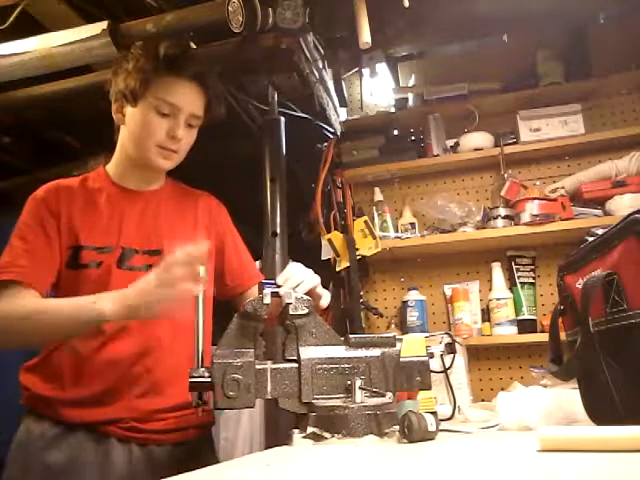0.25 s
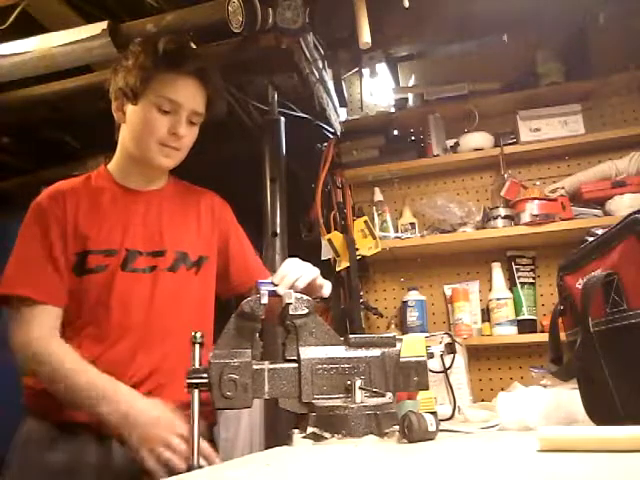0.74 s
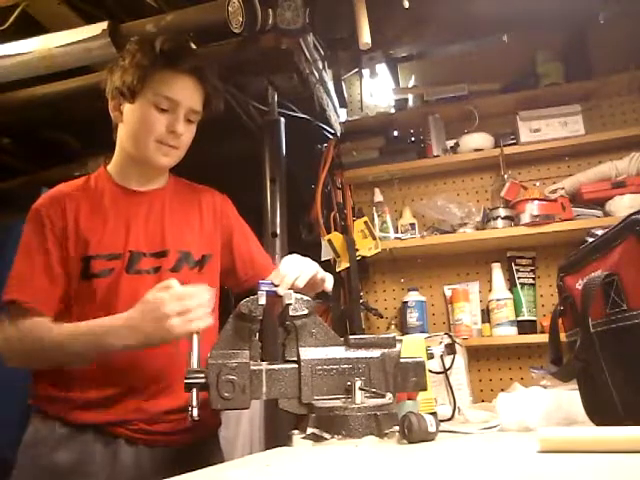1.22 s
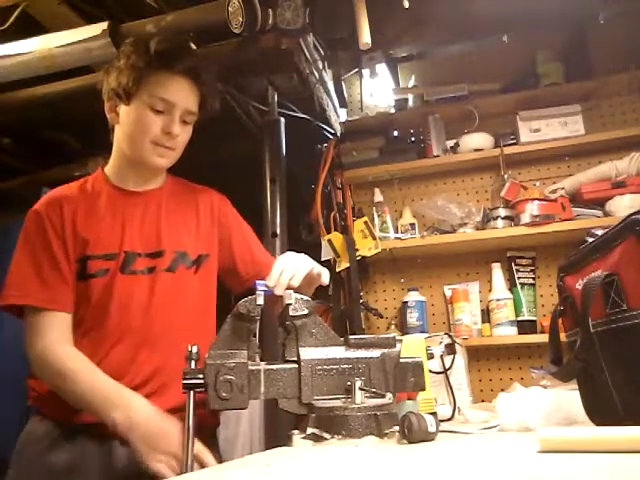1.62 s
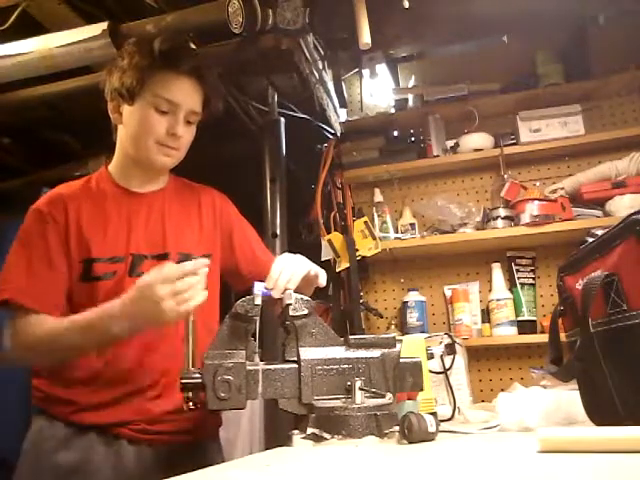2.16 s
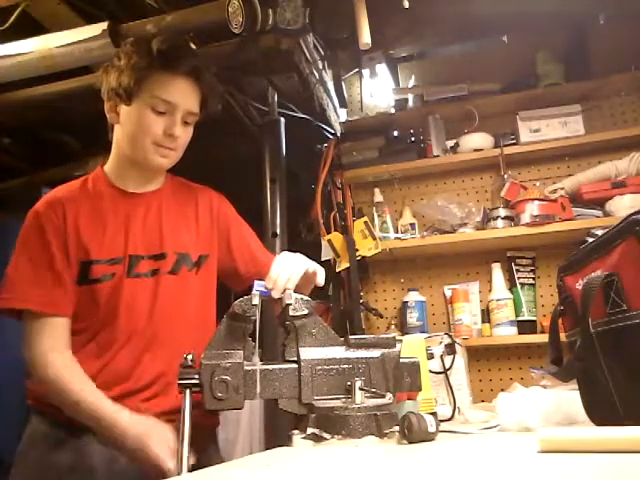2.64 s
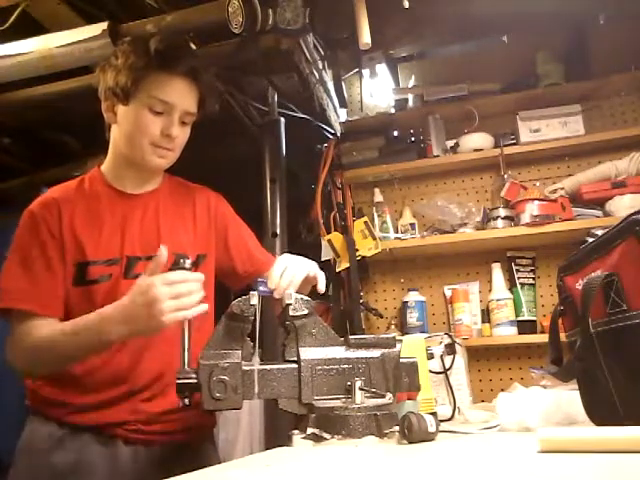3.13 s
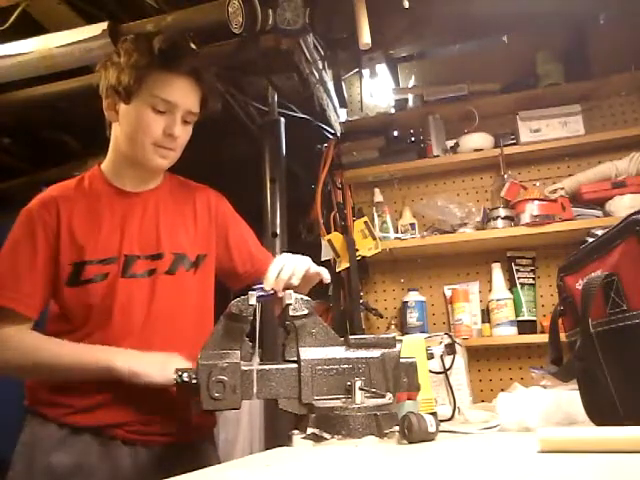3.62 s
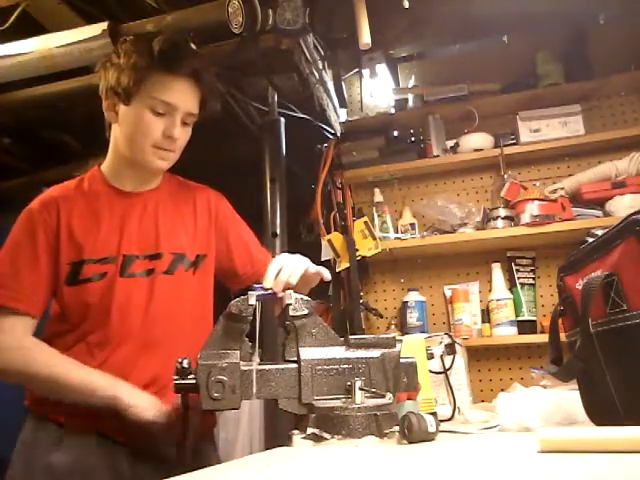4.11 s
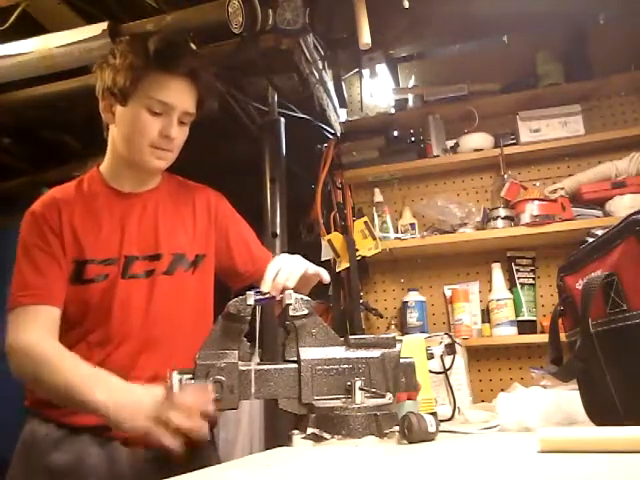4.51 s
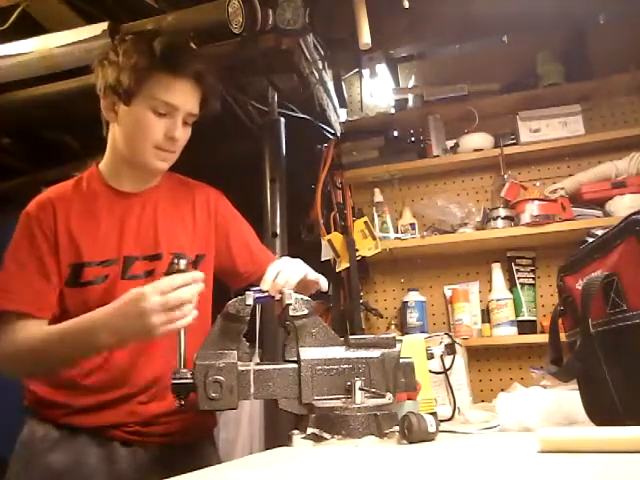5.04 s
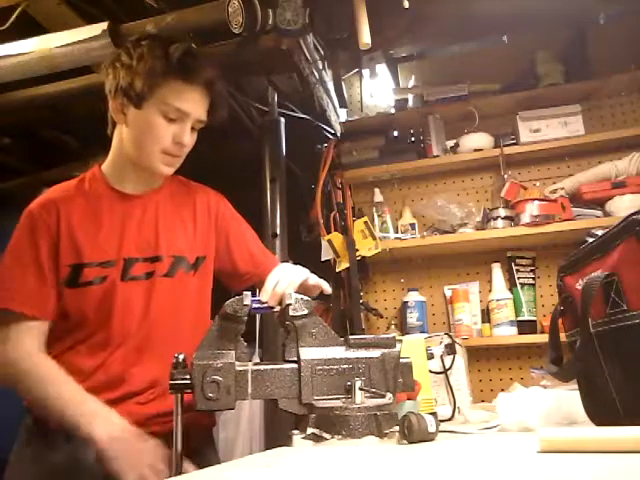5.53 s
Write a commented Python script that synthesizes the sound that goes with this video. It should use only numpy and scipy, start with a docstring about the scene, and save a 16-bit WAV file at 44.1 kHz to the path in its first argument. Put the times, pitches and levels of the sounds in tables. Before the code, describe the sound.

A steel bench vise is wound by hand: loud metal clinks and knocks, then a soft screw rub and light ticks in a workshop.

```python
"""A steel bench vise is wound by hand in a small basement workshop, heard by a spaced pair of microphones
over room rumble and hiss. It opens with a clatter: the loose handle clinks in its eye, the cast body
knocks as play is taken up, and the wooden bench thuds under it. From about 1.6 s it settles into the
soft rub of the turning screw and a few light ticks, and at 2.66 s a thin electronic whine comes in.
Two smaller flurries of clinks and knocks, near 4.4 s and 5.5 s, finish the move."""
import sys
import numpy as np
from scipy import signal
from scipy.fft import rfft, irfft, next_fast_len
from scipy.io import wavfile

SR = 44100
rng = np.random.default_rng(int(sys.argv[2]) if len(sys.argv) > 2 else 0)


def bounce(signal):
    """Save signal as a 16-bit WAV file at the path given by the first command-line argument."""
    frames = np.transpose(np.atleast_2d(signal))
    limited = np.clip(frames, -1, 1)
    pcm = np.round(limited * 32767).astype(np.int16)
    wavfile.write(sys.argv[1], SR, pcm)


N = 254456

# The loose handle slapping in its eye.
# Each row: start in seconds, strength in dB, centre pitch in Hz, chatter length in seconds.
HANDLE_CLINKS = [(0.156, -20, 1740, 0.071), (0.3073, -31, 1740, 0.084), (0.328, -26, 1580, 0.094),
                 (0.3647, -9.5, 3350, 0.091), (0.5765, -21.5, 2070, 0.13), (0.9946, -24.5, 1700, 0.043),
                 (1.1032, -25.5, 2080, 0.13), (1.154, -33, 1690, 0.24), (1.165, -37, 3600, 0.0081),
                 (1.217, -18, 1600, 0.12), (1.2413, -23, 1850, 0.033), (1.432, -25, 1520, 0.069),
                 (1.4673, -35, 1640, 0.052), (1.5794, -34, 1500, 0.023), (1.873, -33, 1900, 0.12),
                 (1.897, -35, 4000, 0.048), (2.001, -48, 1810, 0.043), (2.078, -51.5, 2000, 0.04),
                 (2.7322, -43.5, 3050, 0.016), (2.746, -41.5, 2620, 0.07), (2.7715, -40.5, 3000, 0.012),
                 (2.7765, -39.5, 3320, 0.069), (2.8003, -46, 2500, 0.04), (2.851, -45, 4300, 0.025),
                 (3.0153, -46, 1840, 0.095), (3.2128, -45.5, 1830, 0.051), (3.3726, -47.5, 1746, 0.084),
                 (3.5503, -46.5, 1990, 0.037), (3.6121, -41.5, 2370, 0.027), (3.933, -42, 3270, 0.1),
                 (3.9676, -51, 2510, 0.045), (4.3748, -29.5, 3036, 0.03), (4.441, -53, 2600, 0.0089),
                 (4.5012, -26, 2880, 0.0042), (4.5035, -27, 2910, 0.038), (4.7313, -44.5, 2410, 0.033),
                 (4.7701, -48, 3010, 0.031), (5.391, -45, 3570, 0.086), (5.5253, -31.5, 2170, 0.045),
                 (5.551, -31, 3180, 0.028)]
# Touches that ring a narrow band of the handle.
# Each row: start in seconds, strength in dB, centre pitch in Hz, chatter length in seconds.
HANDLE_PINGS = [(0.157, -35, 3370, 0.021), (0.2386, -33.5, 3440, 0.065), (0.3655, -17, 2860, 0.029),
                (1.105, -43, 3370, 0.03), (1.1555, -29.5, 1650, 0.024), (1.218, -38, 3300, 0.06),
                (1.241, -35, 3300, 0.025), (1.433, -41, 3100, 0.023), (2.8675, -46, 1740, .012),
                (4.5012, -28, 3710, 0.013), (5.3564, -46.5, 3680, 0.044), (5.4101, -46.5, 3680, 0.025),
                (5.4573, -49, 3670, 0.061)]
# Play being taken up in the cast body.
# Each row: start in seconds, strength in dB, centre pitch in Hz, chatter length in seconds.
BODY_KNOCKS = [(0.119, -51, 880, 0.039), (0.157, -20, 870, 0.065), (0.238, -33, 1160, 0.019),
               (0.308, -31, 1230, 0.13), (0.329, -31, 840, 0.25), (0.366, -13, 834, 0.039),
               (0.379, -26, 655, 0.014), (0.576, -42.5, 920, 0.18), (0.61, -31.5, 664, 0.022),
               (0.794, -46, 870, 0.12), (0.969, -52, 675, 0.027), (0.998, -22, 1060, 0.031),
               (1.064, -45, 700, 0.027), (1.113, -21, 790, 0.0093), (1.126, -26.5, 503, 0.0096),
               (1.154, -24, 900, 0.085), (1.223, -18.5, 770, 0.044), (1.239, -19.5, 770, 0.024),
               (1.432, -37, 780, 0.13), (1.468, -35.5, 710, 0.084), (1.505, -36.5, 595, 0.1),
               (1.58, -39, 1030, 0.038), (1.897, -44, 740, 0.021), (2.002, -50, 613, 0.035),
               (2.733, -54, 600, 0.01), (2.772, -53.5, 514, 0.043), (2.868, -48.5, 890, 0.01),
               (3.048, -38, 721, 0.029), (3.549, -52.5, 1010, 0.038), (3.934, -45, 1037, 0.09),
               (3.968, -48.5, 1064, 0.014), (4.376, -36, 990, 0.038), (4.44, -51.5, 506, 0.026),
               (4.475, -51.5, 896, 0.033), (4.503, -43.5, 536, 0.017), (4.638, -50, 686, 0.015),
               (4.732, -55.5, 694, 0.041), (4.772, -51.5, 1040, 0.018), (5.245, -51, 613, 0.043),
               (5.458, -42.5, 495, 0.031), (5.525, -39, 1100, 0.048), (5.552, -41.5, 1060, 0.05),
               (5.605, -54, 950, 0.022), (5.624, -45.5, 1050, 0.016), (5.651, -51, 1023, 0.028)]
# The bench top taking the load.
# Each row: start in seconds, strength in dB, centre pitch in Hz, chatter length in seconds.
BENCH_THUDS = [(0.098, -32, 71, 0.2), (0.165, -23, 144, 0.083), (0.22, -31.5, 71.6, 0.076),
               (0.327, -32.5, 178, 0.12), (0.377, -18, 126, 0.061), (0.612, -24.5, 302, 0.057),
               (1.005, -25.5, 298, 0.079), (1.03, -31, 61.7, 0.078), (1.123, -21.5, 200, 0.018),
               (1.162, -22, 380, 0.008), (1.18, -17, 69.6, 0.34), (1.229, -23, 165, 0.23),
               (1.255, -21.5, 80, 0.091), (1.448, -33.5, 119, 0.083), (1.506, -26.5, 136, 0.03),
               (1.893, -38, 216, 0.067), (2.157, -44.5, 193, 0.029), (3.058, -40, 222, 0.031),
               (4.485, -36.5, 150, 0.086), (4.641, -49.5, 194, 0.092), (5.246, -50.5, 188, 0.029),
               (5.464, -38, 180, 0.062), (5.524, -38, 139, 0.012)]
# How each part rings. Each row: pitch in Hz, relative level in dB, time to fade 60 dB in seconds.
HANDLE_MODES = [(1380, 11, 0.007), (1660, -1.5, 0.015), (1770, 12, 0.0084), (1916, -14.5, 0.025),
                (2330, -3, 0.02), (2490, -6, 0.025), (2734, -6.5, 0.01), (2880, -1, 0.016),
                (3154, 2.5, 0.0097), (3329, 0, 0.026), (3690, -0.5, 0.014), (4037, -0.5, 0.017),
                (4450, 2.5, 0.0093), (4800, -2, 0.02), (5466, 5, 0.0036), (6090, -4, 0.016),
                (6630, -1.5, 0.018), (8000, -21, 0.014), (11220, -11, 0.0087), (10140, -4, 0.0226),
                (14320, -13.5, 0.0393)]
BODY_MODES = [(420.6, -6, 0.039), (515, -6, 0.11), (612.5, -5.5, 0.07), (700.4, 5.5, 0.048),
              (770.5, 3.5, 0.026), (867.4, -0.5, 0.05), (987.5, 5.5, 0.025), (1270, -12.5, 0.021)]
BENCH_MODES = [(81.7, 5, 0.067), (104, 0, 0.063), (157, -4, 0.05), (199.2, 3.5, 0.055), (235, -1.5, 0.044),
               (302, 2, 0.045), (363.5, -5, 0.055)]
# The screw turning in its nut. Each row: time in seconds, body rub in dB, bench rumble in dB.
SCREW_RUB = [(0, -76.5, -60), (.1, -61, -91), (0.4, -63, -42), (0.561, -57.5, -51.5), (0.851, -70.5, -68.5),
             (.98, -68, -64), (1.219, -56, -31.5), (1.498, -61.5, -54.5), (1.7, -70.5, -67),
             (2.25, -67.5, -66.5), (2.361, -65, -63), (2.5, -70, -65), (2.62, -64, -65), (2.7, -68.5, -62),
             (2.78, -66, -68), (2.9, -67, -67.5), (3.2, -68, -64), (3.402, -80.5, -72), (4.198, -77, -74),
             (4.499, -64.5, -63), (4.849, -89.5, -72), (5.279, -73.5, -76), (5.402, -60, -59),
             (5.578, -60, -58.5), (5.719, -84.5, -71)]
# The colour of the room tone. Each row: frequency in Hz, relative level in dB.
ROOM_SPECTRUM = [(29, -46), (55, -17.5), (245, -4.5), (688, -11), (795, -6.5), (1260, -6), (4390, -17),
                 (14300, -19.5), (15700, -20)]
# How centred the room tone sits. Each row: frequency in Hz, left-right correlation (1 is mono).
ROOM_CORRELATION = [(60, 0.41), (500, 0.2794), (1500, 0.1255), (5000, 0.042), (14000, 0.081)]
# The tones of the electronic whine. Each row: pitch in Hz, rms level in dB.
WHINE_TONES = [(13001, -95), (14002, -83), (14998, -96)]

STIFF_HZ = 4364   # above this pitch, harder blows sound brighter
LOBE_HZ, LOBE_TURNS, LEFT_DB_PER_OCTAVE = 850, 0.22, 1.33   # higher modes spread in phase and lean left


def steel_handle(rub_db):
    """The handle slaps and pings in its eye, and slides through it as the screw turns."""
    clinks = struck(HANDLE_CLINKS, HANDLE_MODES, rise_s=0.00022, snap_db=-6.5, gain_db=1.5,
                    scatter_db=1.5, spread_octaves=1.08, bright_db=15)
    pings = struck(HANDLE_PINGS, HANDLE_MODES, rise_s=0.00023, snap_db=-11, gain_db=4,
                   scatter_db=1, spread_octaves=0.17, bright_db=9)
    slide = rubbed(HANDLE_MODES[:14], rub_db - 9, grains_per_s=2975, ring_scale=0.94, uneven_db=3.5)
    return (clinks + pings + slide) * pan(left_db=-0.5)


def cast_body(rub_db):
    """The casting knocks as play is taken up and carries the rub of the thread."""
    knocks = struck(BODY_KNOCKS, BODY_MODES, rise_s=0.0015, snap_db=-6, gain_db=4,
                    scatter_db=2.5, spread_octaves=0.43, detune=0.034)
    return knocks + rubbed(BODY_MODES, rub_db, grains_per_s=1200, ring_scale=0.77, uneven_db=4)


def wooden_bench(rumble_db):
    """The bench gives the low end: it thuds under the load and rumbles with the screw."""
    thuds = struck(BENCH_THUDS, BENCH_MODES, rise_s=0.00413, snap_db=-5.5, gain_db=2.5,
                   scatter_db=2.36, spread_octaves=1.7, detune=0.052)
    return thuds + rubbed(BENCH_MODES, rumble_db, grains_per_s=300, ring_scale=1, uneven_db=4)


def struck(blows, modes, rise_s, snap_db, gain_db, scatter_db, spread_octaves, bright_db=0, detune=0.012):
    """Each blow is a snap and a dying chatter of contacts, favouring the modes near its own pitch."""
    hz, mode_db, t60 = np.transpose(modes)
    size = 8192
    out = np.zeros((2, N + size))
    top_octaves = np.maximum(np.log2(hz / STIFF_HZ), 0)
    mic_gains = lobes(hz)
    for start_s, strength_db, centre_hz, chatter_s in blows:
        contacts = chatter(len(hz), rise_s, chatter_s)
        contacts[:, round(rise_s * SR)] += from_db(snap_db)   # the snap hits all modes together
        tuned_hz = hz * (1 + detune * rng.standard_normal(len(hz)))   # parts sit differently each blow
        rings = resonate(rfft(contacts, size), tuned_hz[:, None], t60[:, None])
        balance = from_db(mode_db - 6 * (np.log2(hz / centre_hz) / spread_octaves) ** 2)
        balance *= from_db(scatter_db * rng.standard_normal(len(hz)))
        balance *= from_db(strength_db + gain_db) / np.linalg.norm(balance)
        balance *= from_db((bright_db + strength_db) * top_octaves)   # only hard blows wake the top
        start = round(start_s * SR)
        out[:, start:start + size] += irfft((balance * mic_gains) @ rings, size)
    return out[:, :N]


def chatter(mode_count, rise_s, chatter_s):
    """Rattling contacts: a noise burst for each mode, all under one lumpy, dying envelope."""
    t = np.arange(4096) / SR
    lump_db = 4 * np.minimum(rng.exponential(1, len(t) // 32), 3)
    lumps = from_db(np.repeat(lump_db, 32))
    lumps[:64] = lumps.max()   # the first contacts are the firmest
    envelope = lumps * (1 - np.exp(-t / rise_s)) * from_db(-60 * t / chatter_s)
    return rng.standard_normal((mode_count, len(t))) * envelope / np.linalg.norm(envelope)


def resonate(force_spectra, hz, t60):
    """Spectra of damped modes rung through springy contacts, each with the energy of a unit click."""
    f = np.linspace(0, SR / 2, force_spectra.shape[1])
    loss = np.log(1000) / (2 * np.pi * t60)
    response = SR / (2 * np.pi) * hz / (hz ** 2 + (loss + 1j * f) ** 2)
    response /= (1 + 0.7j * (f / hz - hz / (f + 1))) ** 2   # little force far from the mode
    rings = response * force_spectra
    click_size = np.linalg.norm(response, axis=1, keepdims=True)
    return rings * click_size / np.linalg.norm(rings, axis=1, keepdims=True)


def lobes(hz):
    """Short waves radiate in lobes, so high modes reach the two microphones out of step."""
    turns = LOBE_TURNS / (1 + (LOBE_HZ / hz) ** 4) * (-1) ** np.arange(len(hz))
    left_db = LEFT_DB_PER_OCTAVE * np.maximum(np.log2(hz / LOBE_HZ), 0)
    return pan(left_db) * np.exp(1j * np.pi * turns * [[1], [-1]])


def rubbed(modes, level_db, grains_per_s, ring_scale, uneven_db):
    """Rough spots on the steel catch at random; the grip cuts each ring time to ring_scale of itself."""
    sizes = from_db(uneven_db * np.minimum(rng.exponential(1, N), 4)) * rng.choice([-1, 1], N)
    grains = sizes * (rng.random(N) < grains_per_s / SR)
    rings = sum(from_db(db) * ring(grains, hz, t60 * ring_scale) for hz, db, t60 in modes)
    return from_db(level_db) * unit_rms(rings)


def ring(force, hz, t60):
    """One mode rings as a dying sine; contacts are springy, so little force lies far from its pitch."""
    decay, step = from_db(-60 / (t60 * SR)), 2 * np.pi * hz / SR
    near = filtered(force + 1e-18, 1, [hz / 1.5, min(hz * 1.5, 20000)], "band")
    return signal.lfilter([0, np.sin(step)], [1, -2 * decay * np.cos(step), decay ** 2], near)


def steel_rasp(rub_db):
    """Fine grit under the sliding handle: wide, bright noise tucked beneath the rub."""
    grit = filtered(rng.standard_normal((2, N)), 2, 6160, "high")
    return from_db(rub_db - 12) * pan(left_db=3) * unit_rms(grit)


def workshop_reverb(x, t60_s=0.13, wall_cut_hz=10000):
    """Close walls throw the sound back: eight feedback delays a side, duller on every round."""
    size = next_fast_len(N + SR)
    hz = np.linspace(0, SR / 2, size // 2 + 1)
    dulling = 1 / np.sqrt(1 + (hz / wall_cut_hz) ** 2)
    sides = np.zeros((2, len(hz)), complex)
    for k, delay_s in enumerate(rng.uniform(0.006, 0.03, 16)):
        loop = from_db(-60 * delay_s / t60_s) * dulling * np.exp(-2j * np.pi * hz * delay_s)
        sides[k % 2] += loop / (1 - loop) * (-1) ** (k // 2)
    return irfft(rfft(x, size) * sides, size)[:, :N]


def room_tone(level_db=-67.5):
    """A bed of rumble and hiss: half-octave bands of stereo noise, most centred in the bass."""
    bed, edges = 0, 30 * 2 ** np.arange(0, 9.6, 0.5)
    white = rng.standard_normal((2, 2, N))
    for k, (low, high) in enumerate(zip(edges, edges[1:])):
        centre_hz = np.sqrt(low * high)
        mid, side = filtered(white[k % 2], 2, [low, high], "band")
        alike = at_hz(ROOM_CORRELATION, centre_hz)
        band = np.sqrt(1 + alike) * mid + np.sqrt(1 - alike) * side * [[1], [-1]]
        bed += from_db(at_hz(ROOM_SPECTRUM, centre_hz)) * band
    return from_db(level_db) * unit_rms(bed)


def electronic_whine(start_s=2.66):
    """Thin, steady tones a kilohertz apart switch on part way through."""
    t = np.arange(N) / SR
    tones = sum(np.sqrt(2) * from_db(db) * np.sin(2 * np.pi * hz * t) for hz, db in WHINE_TONES)
    return tones * (t > start_s)


def from_db(db):
    return 10 ** (np.asarray(db) / 20)


def unit_rms(x):
    return x / np.sqrt(np.mean(x ** 2) + 1e-20)


def pan(left_db):
    return from_db(left_db / 2 * np.array([[1], [-1]]))


def at_hz(points, hz):
    point_hz, values = np.transpose(points)
    return np.interp(np.log(hz), np.log(point_hz), values)


def filtered(x, order, edges_hz, kind):
    return signal.sosfilt(signal.butter(order, edges_hz, kind, fs=SR, output="sos"), x)


def scene():
    """The vise up front, a short reverb behind it, room tone and whine underneath."""
    t = np.arange(N) / SR
    times_s, *levels_db = np.transpose(SCREW_RUB)
    rub_db, rumble_db = [np.interp(t, times_s, db) for db in levels_db]
    vise = steel_handle(rub_db) + cast_body(rub_db) + wooden_bench(rumble_db) + steel_rasp(rub_db)
    reverb = from_db(-11) * workshop_reverb(vise.mean(axis=0))
    return vise + reverb + room_tone() + electronic_whine()


def record(dry):
    """The small microphones lose the deep bass; the top is cut steeply, gone by 16 kHz."""
    thin = filtered(dry, 4, 58, "high")
    return signal.sosfilt(signal.cheby2(20, 60, 16000, fs=SR, output="sos"), thin)


dry = scene()
out = record(dry)
bounce(out)
```